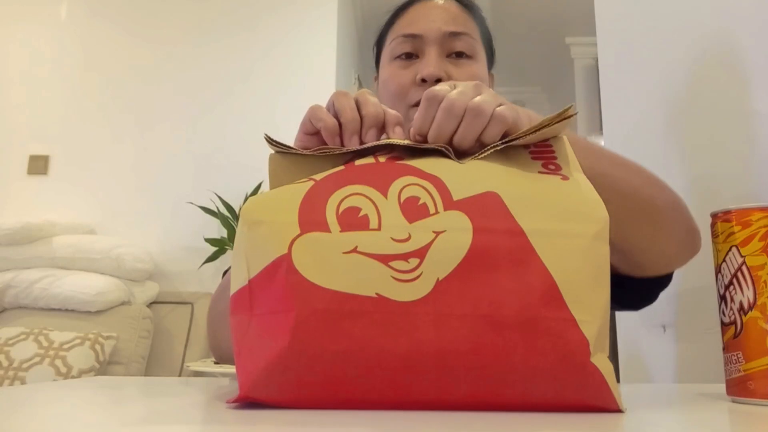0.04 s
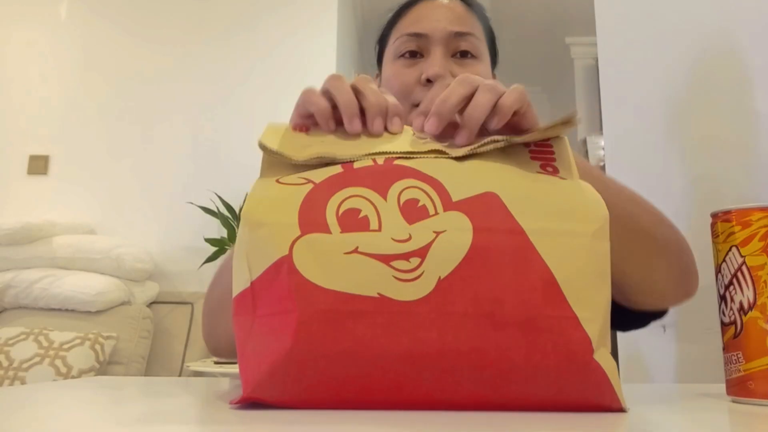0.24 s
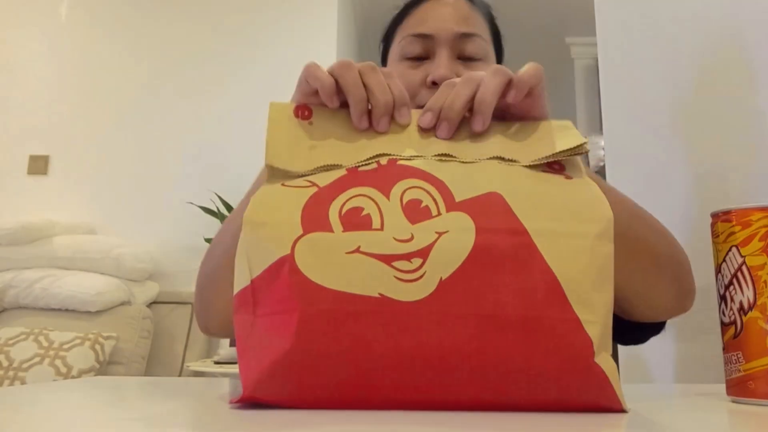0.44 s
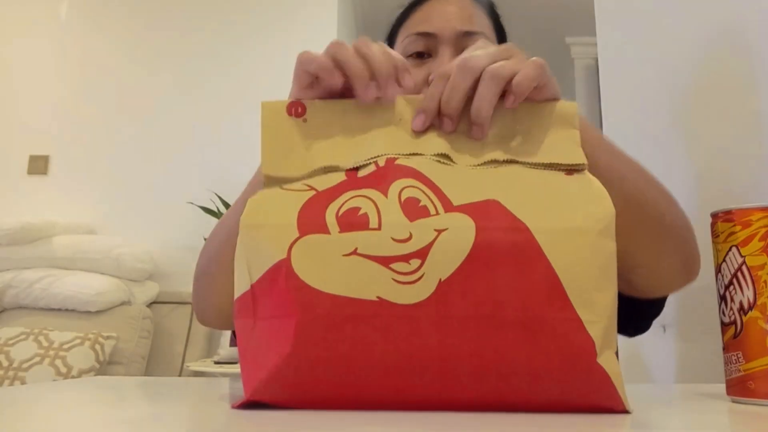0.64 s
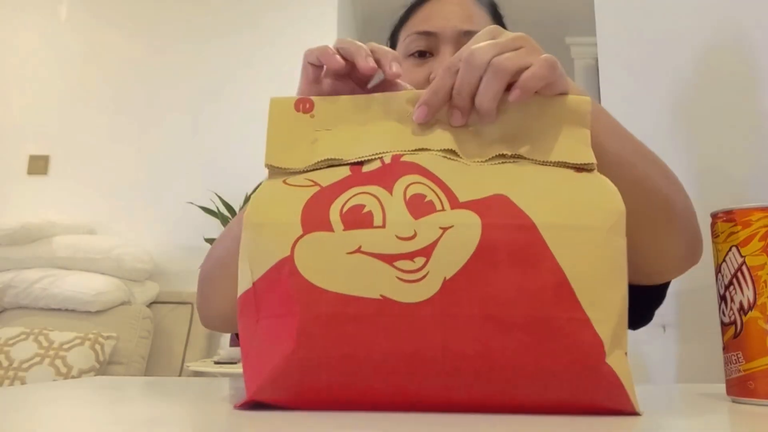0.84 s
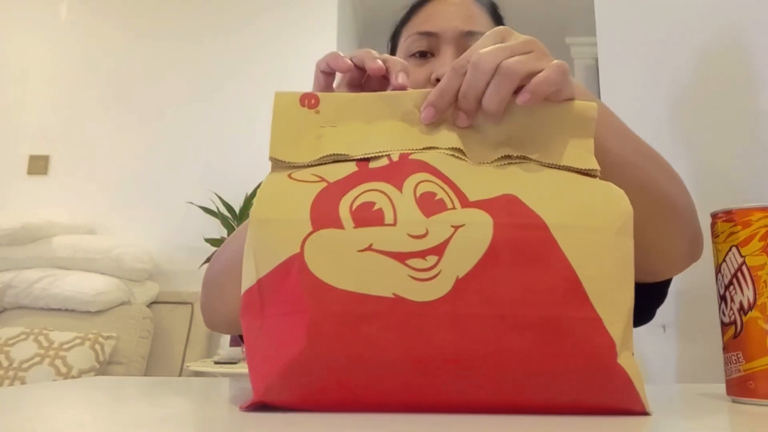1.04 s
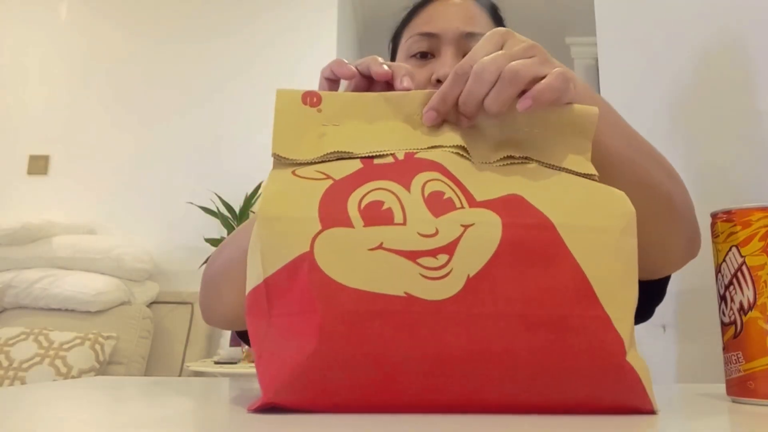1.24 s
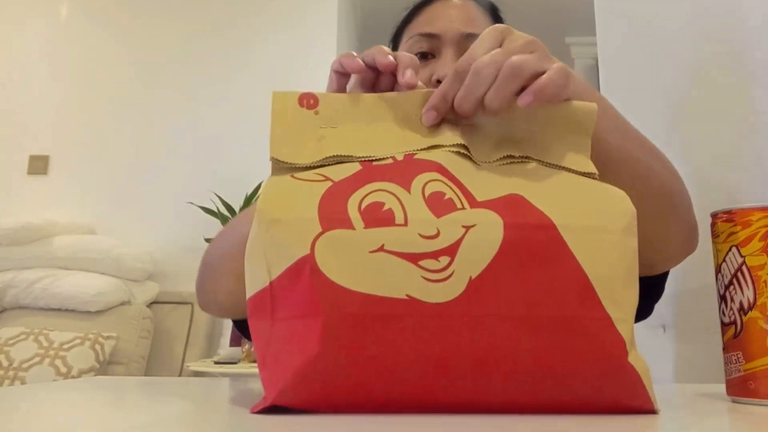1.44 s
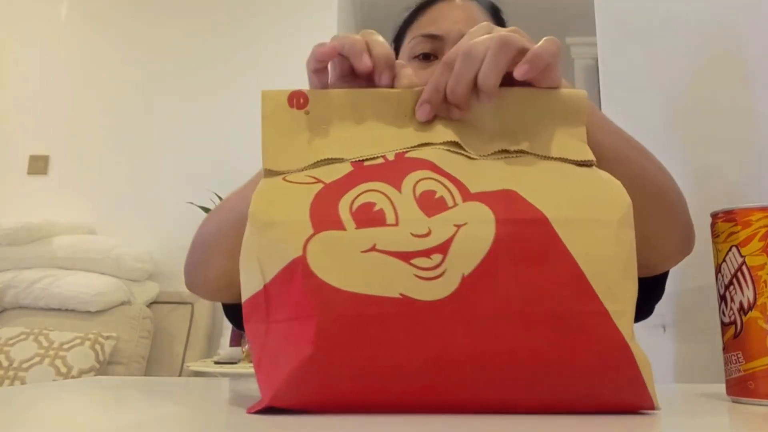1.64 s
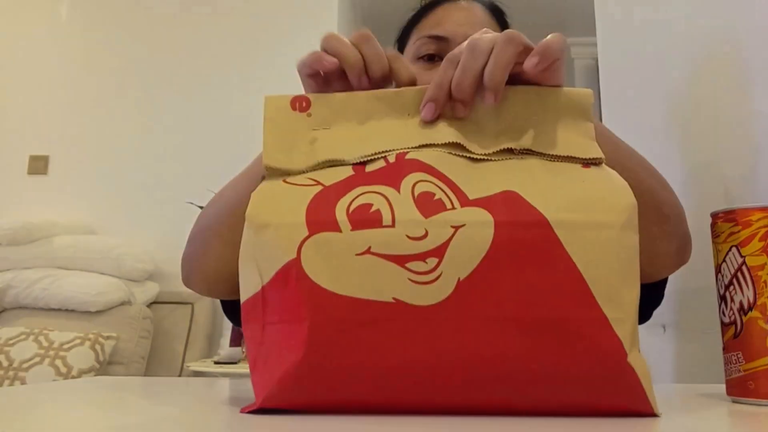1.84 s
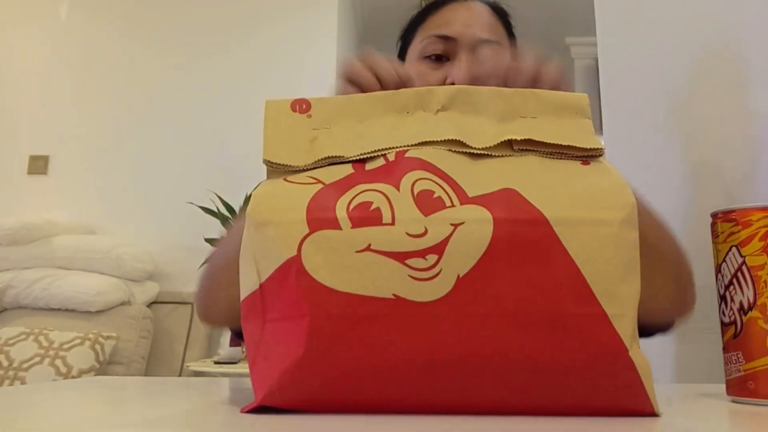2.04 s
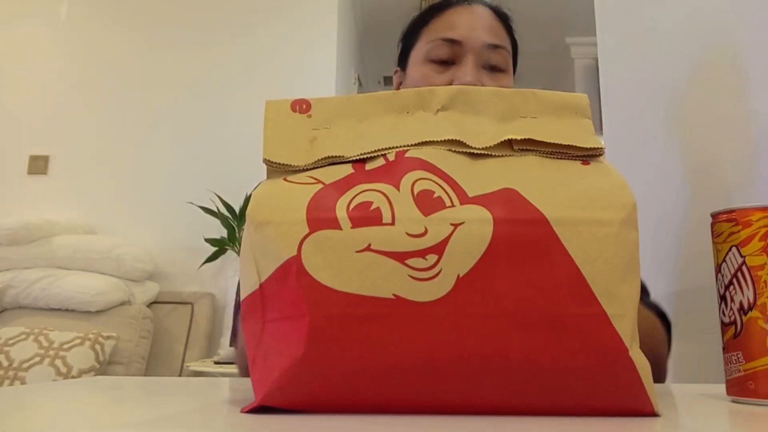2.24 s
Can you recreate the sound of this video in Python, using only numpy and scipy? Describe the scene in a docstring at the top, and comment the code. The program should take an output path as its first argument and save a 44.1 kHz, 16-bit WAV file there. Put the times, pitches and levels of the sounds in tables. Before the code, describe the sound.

A stiff paper takeout bag crinkles and snaps as fingers work its folded top indoors

```python
"""Fingers work the folded top of a paper bag on a table, close to a small microphone in a furnished room.
From 0 s: low room hum (coloured noise), faint rustle (sprays of clicks over rubbing hiss) and a soft thump.
From 0.2 s to 2.0 s: creases snap as ringing click bursts, the hollow bag booms under them (narrowed noise),
finer crackle and rubbing fill the gaps, and the room answers with noise tails; then the rustle dies away."""
import sys
import numpy as np
from scipy import signal
from scipy.fft import rfft, irfft, next_fast_len
from scipy.io import wavfile

SR = 44100
rng = np.random.default_rng(int(sys.argv[2]) if len(sys.argv) > 2 else 0)


def gain_from_db(level_db):
    """Convert decibel levels to linear amplitude factors (20 dB per decade)."""
    decades = np.asarray(level_db, float) / 20
    return 10 ** decades


def transcribe(signal):
    """Save signal, clipped to [-1, 1], as a 16-bit WAV file at the path in sys.argv[1]."""
    frames = np.atleast_2d(signal).T
    limited = np.clip(frames, -1, 1)
    pcm = np.round(limited * 32767).astype(np.int16)
    wavfile.write(sys.argv[1], SR, pcm)


N = 101429
SPIKY_DB = 3


def unit(x):
    """Scale to rms 1."""
    return x / np.sqrt(np.mean(x ** 2) + 1e-20)


def along(points, hz):
    """Interpolate (frequency [Hz], value) points on a log frequency axis."""
    f, v = np.transpose(points)
    return np.interp(np.log(hz + 1), np.log(f + 1), v)


def curves(rows):
    """Interpolate each column after the time to one value per sample."""
    s, *cols = np.transpose(rows)
    return [np.interp(np.arange(N) / SR, s, c) for c in cols]


def coloured(x, points):
    """Minimum-phase (causal) filter that keeps the power of white noise."""
    m = 2 * next_fast_len(len(x) // 2 + 4096)
    gain = unit(gain_from_db(along(points, np.fft.rfftfreq(m, 1 / SR))))
    cepstrum = irfft(np.log(gain + 1e-4), m)
    # fold the cepstrum onto positive time
    cepstrum[1:m // 2] *= 2
    cepstrum[m // 2 + 1:] = 0
    response = np.exp(rfft(cepstrum))
    return irfft(rfft(x, m) * response, m)[:len(x)]


def spiky(size, spread_db=SPIKY_DB):
    """Uneven tiny clicks: white noise with a random gain per 16 samples, rms 1."""
    gain_db = spread_db * np.repeat(rng.standard_normal(size // 16 + 1), 16)[:size]
    return unit(rng.standard_normal(size) * gain_from_db(gain_db))


def waver(size, hz, q):
    """Wavering tone: noise narrowed twice around hz, rms 1, filter onset discarded."""
    peak = signal.iirpeak(hz, q, SR)
    once = signal.lfilter(*peak, rng.standard_normal(2 * size))
    return unit(signal.lfilter(*peak, once)[size:])


# room hum spectrum: (frequency [Hz], relative density [dB per Hz])
FLOOR_SPECTRUM = [(15, -98), (25, -9.5), (87, -5.5), (170, -18), (263, -15), (16000, -56)]
FLOOR_DB = -53.5


def room_hum():
    """Steady noise of the quiet room, mostly low."""
    return gain_from_db(FLOOR_DB) * coloured(rng.standard_normal(N), FLOOR_SPECTRUM)


CRACKLE_SPREAD_DB, CRACKLE_T60_S = 3.5, 0.014


def crackle(per_s):
    """Small creases at random times and sizes, each a decaying spray of clicks."""
    luck = rng.random((2, N))
    size_db = -CRACKLE_SPREAD_DB * np.log(luck[1] + 0.0047)
    starts = (luck[0] < per_s / SR) * gain_from_db(size_db)
    decay = gain_from_db(-60 / (CRACKLE_T60_S * SR))
    return unit(signal.lfilter([1], [1, -decay], starts) * spiky(N))


# handling of the paper: (time [s], rustle level [dB], treble level over the rustle [dB])
HANDLING = [(0, -45, -31), (.045, -62.5, -17), (.15, -61, -2), (.175, -54.5, -16), (.205, -31.5, -10),
            (.42, -31.5, -13.5), (.65, -32.5, -8), (.83, -29.5, -19.5), (.9, -58.5, -10), (.96, -41.5, -12),
            (1.08, -32.5, -24.5), (1.17, -52, -12), (1.2, -32, -17), (1.36, -35, -22), (1.5, -48.5, -28),
            (1.56, -50.5, -16.5), (1.66, -27, -13), (1.73, -51.5, -30), (1.82, -25, -9),
            (1.9, -30.5, -30.5), (1.96, -50.5, 1.5), (2.0, -52.5, -1.5), (2.05, -43, -36), (2.09, -70, -5)]
# paper spectrum: (frequency [Hz], relative density [dB per Hz])
PAPER_SPECTRUM = [(180, -25), (329, -14.5), (445, -1.5), (2080, -5), (7000, -20), (9100, -46),
                  (15400, -120)]
# microphone peaks and dips: (frequency [Hz], relative density [dB per Hz])
MIC_TREBLE = [(3530, -20.5), (6000, 4), (7280, -12.5), (7900, -5.5), (10200, 4.5), (12600, -13.5),
              (13600, -16.5), (15000, 1.5), (16000, -27)]
CRACKLES_PER_S, CRACKLE_Q, RUB_DB = 1700, 1.74, -8  # rate over all colours; rubbing re crackle


def rustle():
    """Small creases, each ringing in one of ten resonant colours, crackle over the hiss of rubbing fingers."""
    level_db, treble_db = curves(HANDLING)
    colours_hz = np.geomspace(350, 14000, 10)
    creases = np.zeros(N)
    for hz in colours_hz:
        peak = signal.iirpeak(hz, CRACKLE_Q, SR)
        creases += signal.lfilter(*peak, crackle(CRACKLES_PER_S / len(colours_hz)))
    rub = gain_from_db(RUB_DB) * rng.standard_normal(N)
    grain = gain_from_db(level_db) * (unit(creases) + rub)
    treble_rub = gain_from_db(level_db + RUB_DB) * rng.standard_normal(N)
    treble = gain_from_db(treble_db) * (grain + treble_rub)
    return coloured(grain, PAPER_SPECTRUM) + coloured(treble, MIC_TREBLE)


# sharp flexes of the bag walls: (time [s], level [dB], pitch [Hz])
THUMPS = [(0, -26, 610), (0.209, -28.5, 449), (1.037, -11, 212), (1.43, -11, 440), (1.809, -11.5, 170),
          (2.012, -27, 587)]
# rumble of the flexing walls: (time [s], level over the rustle [dB])
RUMBLE = [(.35, -13), (.42, -0.5), (.75, -2), (.84, -18), (1.06, 4.5), (1.34, 2), (1.43, -15), (1.6, 1.5),
          (1.88, 0), (2.0, -19)]
THUMP_T60_S, THUMP_Q, WAVER_DB = 0.092, 1.7, -6.5
RUMBLE_HZ, RUMBLE_Q = 216, 0.97


def boom():
    """Sharp wall flexes knock out a short tone with a wavering halo; steady handling makes the walls rumble."""
    thumps, t = np.zeros(N + SR), np.arange(SR // 3) / SR
    for s, db, hz in THUMPS:
        tone = np.sin(2 * np.pi * hz * t) + gain_from_db(WAVER_DB) * waver(len(t), hz, THUMP_Q)
        rise = 1 - np.exp(-2 * t * hz)
        thumps[round(s * SR):][:len(t)] += gain_from_db(db - 60 * t / THUMP_T60_S) * rise * tone
    rumble_db = curves(HANDLING)[0] + curves(RUMBLE)[0]
    return thumps[:N] + gain_from_db(rumble_db) * waver(N, RUMBLE_HZ, RUMBLE_Q)


SPLIT_HZ = 3250


def split(x, kind):
    """Second-order filter for the dull (low) or crisp (high) part."""
    return signal.sosfilt(signal.butter(2, SPLIT_HZ, kind, fs=SR, output="sos"), x)


RISE_S, BURST_S = 0.0012, 0.0031


def burst(t, t60_s, spread_db):
    """Clicks that swell, hold until BURST_S, then decay."""
    shape = np.minimum(t / RISE_S, 1) ** 2 * gain_from_db(-60 * np.maximum(t - BURST_S, 0) / t60_s)
    return unit(spiky(len(t), spread_db) * shape) * np.sqrt(np.mean(shape ** 2))


# creases that snap, levels before the offsets below:
# (time [s], level [dB], ring [Hz], treble over level [dB], crisp bite over level [dB])
SNAPS = [(0.2093, -10, 1650, -42, -28), (0.2561, -9.5, 1220, -18, -13), (0.3187, -8, 2650, -11, -13),
         (0.3256, -8.5, 1330, -14, -9), (0.3632, -4, 960, -40, -16.5), (0.3779, -7, 3600, -26, -11.5),
         (0.3917, -11.5, 2160, -7.5, -8.5), (0.4024, -11, 1280, -3.5, -9), (0.4371, -19, 940, -5, -8),
         (0.4706, -4.5, 1550, -13.5, -12.5), (0.4922, -11, 1140, -20, -19), (0.5179, -7, 1270, -4.5, -10),
         (0.5465, -14.5, 2750, -0.5, -8), (0.5823, -3.5, 970, -6, -8), (0.6092, -0.5, 2200, -20, -10.5),
         (0.63, -9.5, 910, -9.5, -5.5), (0.6701, -9, 1950, -4, -7.5), (0.7166, -8.5, 1590, -10, -12),
         (0.759, -7, 1210, -20, -12), (0.7939, -18.5, 1350, -9, -12.5), (0.8077, -26, 2100, 2, -12),
         (0.819, -6.5, 2040, -31, -5), (0.9512, -7, 990, -11, -5.5), (0.9931, -16.5, 2200, -6, -10.5),
         (1.041, -3, 1040, -19.5, -10), (1.1838, -6.5, 2910, -4, -2.5), (1.208, -9.5, 1710, -3, -26),
         (1.2415, -14.5, 1130, -8, -2.5), (1.283, -7, 2030, -15, -13.5), (1.3007, -4, 1380, -30, -15),
         (1.3485, -7.5, 960, -9.5, -15), (1.395, -6, 4000, -28, -13.5), (1.429, -6.5, 1850, -28.5, -8.5),
         (1.5436, -7.5, 780, -25.5, -8), (1.5551, -9.5, 4970, -14, -7), (1.5736, -4.5, 2980, -35, -18),
         (1.5933, -4, 1850, -23, -16.5), (1.6212, -4.5, 1480, -22.5, -10.5),
         (1.6353, -12.5, 820, -4.5, -7.5), (1.7364, -8, 1840, -35.5, -11.5), (1.7735, -8, 1350, -9.5, -6),
         (1.8044, -10.5, 2120, -9, -10.5), (1.8188, -5, 1310, -9.5, -4.5), (1.8366, -2, 1020, -19, -12),
         (1.8609, -10, 1330, -10.5, -8.5), (2.0033, -13, 2600, -21, -7.5), (2.0128, -14.5, 1210, -24, -16)]
SNAP_DB, BITE_DB, SHINE_DB, HOLLOW_DB = -13, 5, -5, -5  # offsets added to the table levels
BURST_T60_S, BITE_T60_S, SHINE_T60_S, SHINE_SPIKY_DB = 0.042, 0.015, 0.0091, -1
RING_DB, RING_Q = 3.5, 8.5
HOLLOW_HZ, HOLLOW_Q, HOLLOW_T60_S, HOLLOW_RISE_S = 540, 1.08, 0.095, 0.0043
HOLLOW_DB_PER_OCTAVE = -6.5  # of the crease's ring above HOLLOW_HZ


def snaps():
    """Creases give way in click bursts, each with its own ring; large, low ones hum the hollow bag most."""
    crease, shine, hollow = np.zeros((3, N + SR))
    t = np.arange(SR // 8) / SR
    for s, db, hz, treble_db, bite_db in SNAPS:
        i = round(s * SR)
        dull = gain_from_db(db + SNAP_DB) * split(burst(t, BURST_T60_S, SPIKY_DB), "low")
        crisp = gain_from_db(db + bite_db + BITE_DB) * split(burst(t, BITE_T60_S, SPIKY_DB), "high")
        clicks = dull + crisp
        ring = gain_from_db(RING_DB) * signal.lfilter(*signal.iirpeak(hz, RING_Q, SR), clicks)
        crease[i:][:len(t)] += clicks + ring
        shine[i:][:len(t)] += gain_from_db(db + treble_db + SHINE_DB) * burst(t, SHINE_T60_S, SHINE_SPIKY_DB)
        body_db = HOLLOW_DB + HOLLOW_DB_PER_OCTAVE * np.log2(hz / HOLLOW_HZ)
        envelope = gain_from_db(db + body_db - 60 * t / HOLLOW_T60_S) * (1 - np.exp(-t / HOLLOW_RISE_S))
        hollow[i:][:len(t)] += envelope * waver(len(t), HOLLOW_HZ, HOLLOW_Q)
    return coloured(crease[:N], PAPER_SPECTRUM) + coloured(shine[:N], MIC_TREBLE) + hollow[:N]


# room decay: (frequency [Hz], T60 [s])
ROOM_T60 = [(200, 0.31), (1000, 0.075), (4000, 0.096), (12000, 0.13)]
ROOM_DB = -7.5


def room(x):
    """Echo: convolution with decaying noise, a new unit-energy tail per 1/16 s of input."""
    out, step = np.zeros(N + SR), SR // 16
    for i in range(0, N, step):
        hz, t, z = signal.stft(rng.standard_normal(SR // 4), SR, nperseg=256)
        decay = gain_from_db(-60 * t / along(ROOM_T60, hz)[:, None])
        tail = signal.istft(z * decay, SR, nperseg=256)[1]
        wet = signal.fftconvolve(x[i:i + step], tail / np.linalg.norm(tail))
        out[i + 150:][:len(wet)] += wet  # delay in samples
    return out[:N]


def scene():
    """Mix the hum, bag, boom and the bag's echo to one channel."""
    floor = room_hum()
    bag = rustle() + snaps()
    return (bag + gain_from_db(ROOM_DB) * room(bag) + boom() + floor)[None]


def roll_off(x):
    """The treble ends steeply here."""
    return signal.sosfilt(signal.butter(12, 17150, fs=SR, output="sos"), x)


CEILING, TOP_HZ = .7, 16900


def record(dry):
    """The input rounds off the highest peaks, then an elliptic low-pass limits the band."""
    soft = dry / (1 + np.abs(dry / CEILING) ** 5) ** (1 / 5)
    low_pass = signal.ellip(8, .3, 60, TOP_HZ, fs=SR, output="sos")
    limited = signal.sosfilt(low_pass, soft)
    return roll_off(limited)


dry = scene()
out = record(dry)
transcribe(out)
```